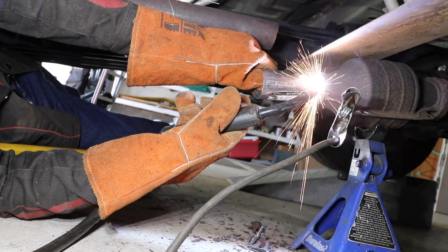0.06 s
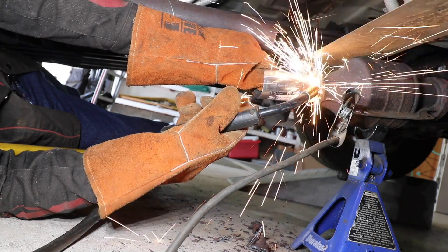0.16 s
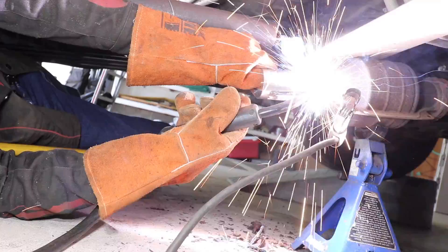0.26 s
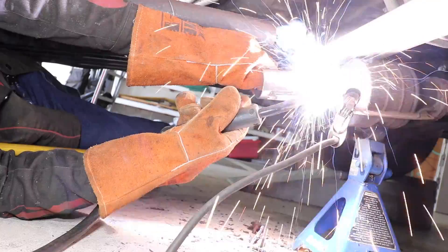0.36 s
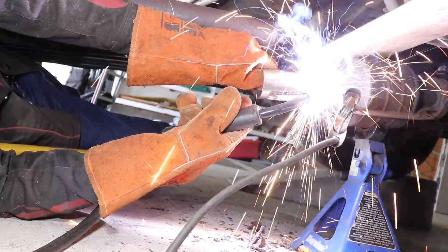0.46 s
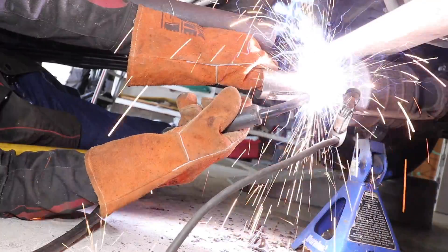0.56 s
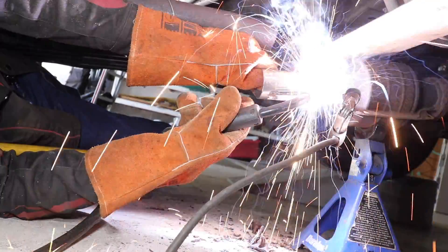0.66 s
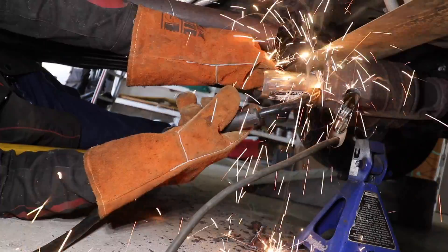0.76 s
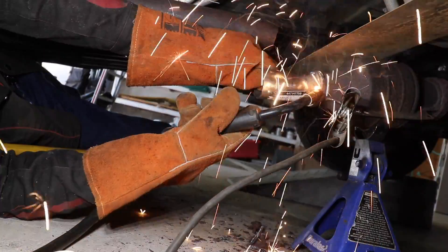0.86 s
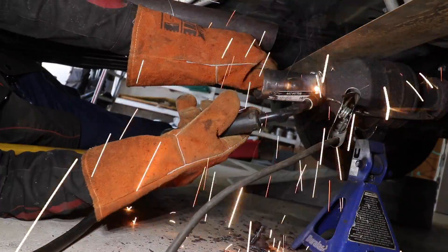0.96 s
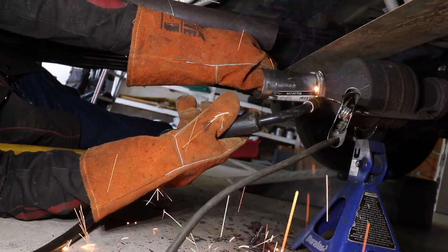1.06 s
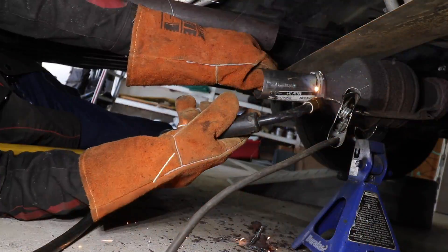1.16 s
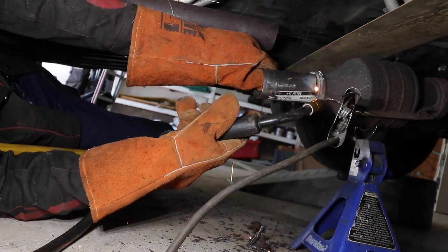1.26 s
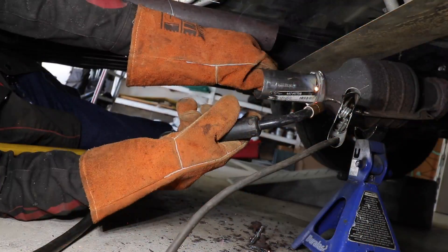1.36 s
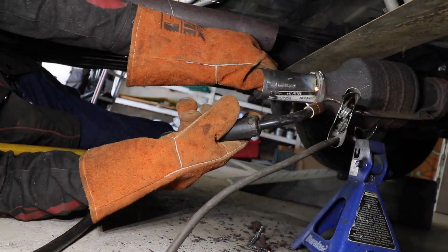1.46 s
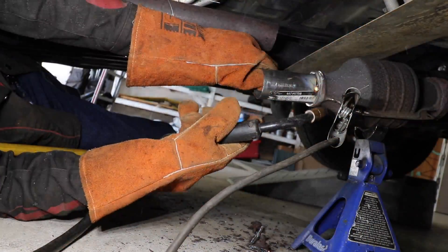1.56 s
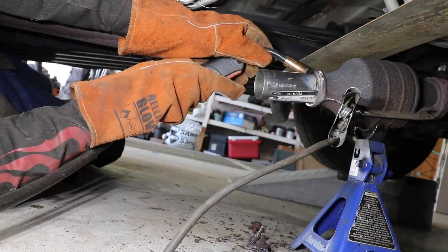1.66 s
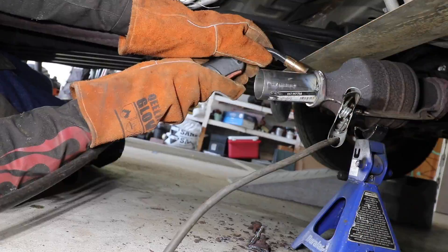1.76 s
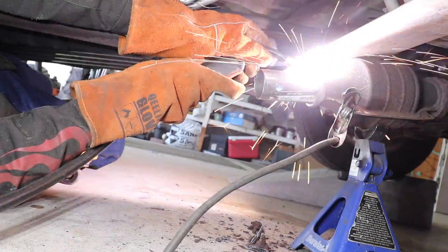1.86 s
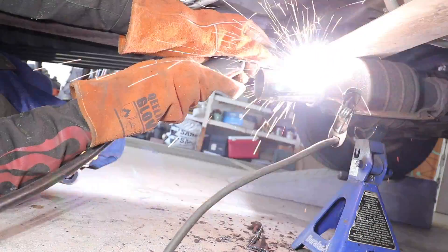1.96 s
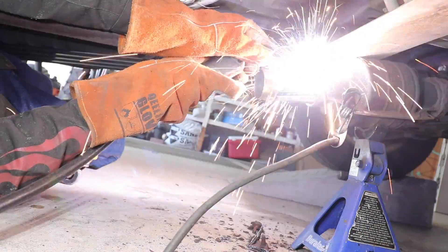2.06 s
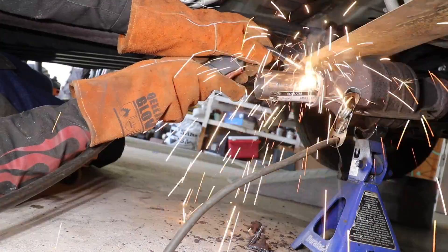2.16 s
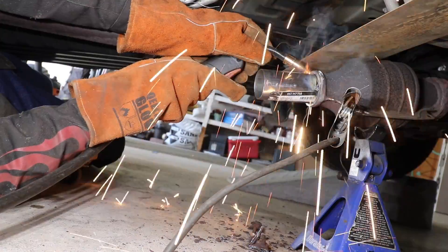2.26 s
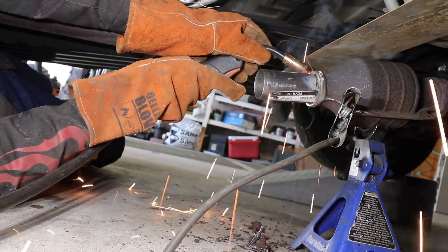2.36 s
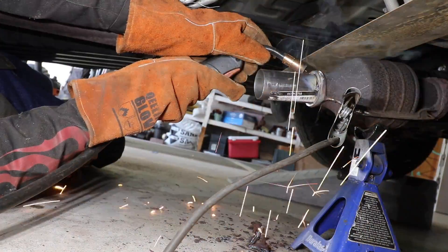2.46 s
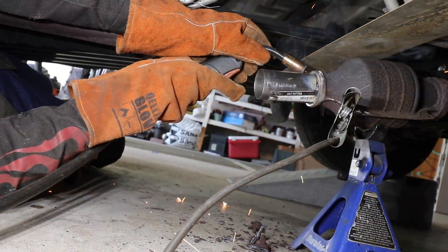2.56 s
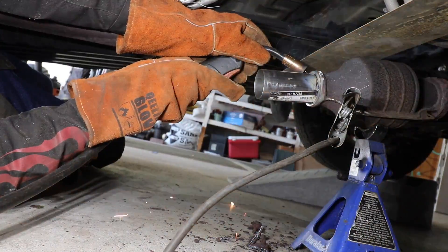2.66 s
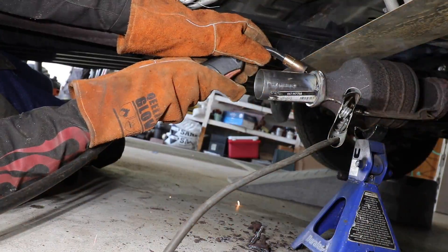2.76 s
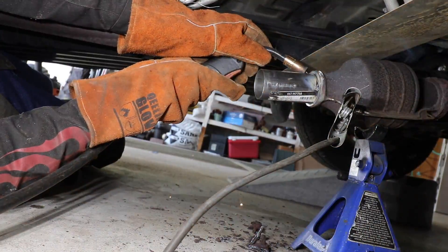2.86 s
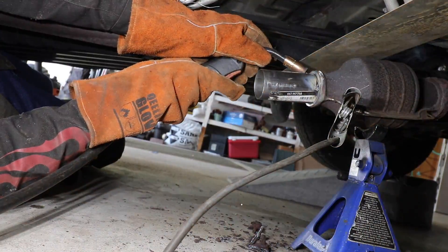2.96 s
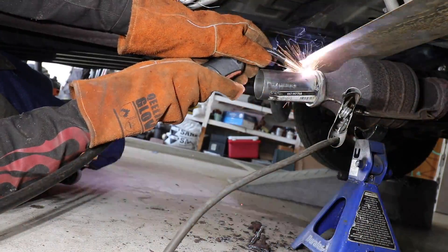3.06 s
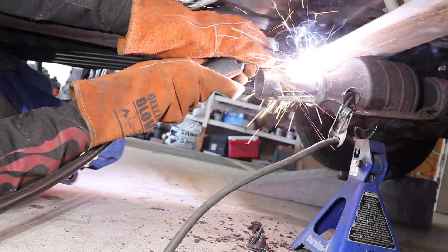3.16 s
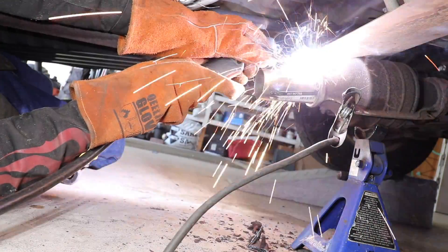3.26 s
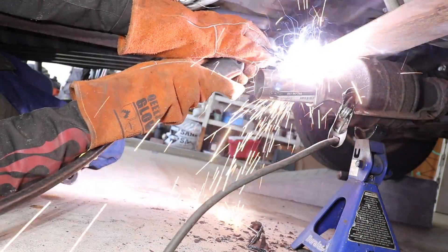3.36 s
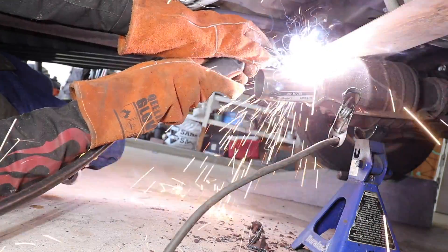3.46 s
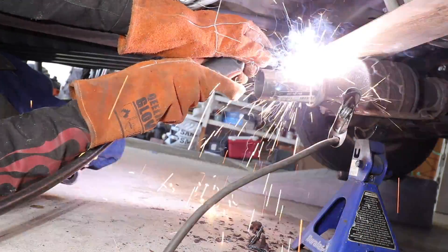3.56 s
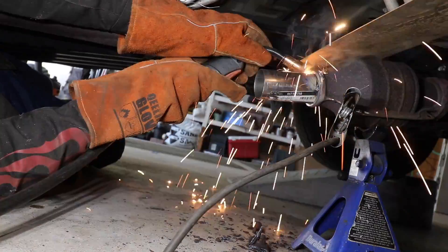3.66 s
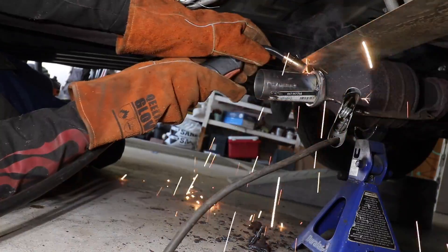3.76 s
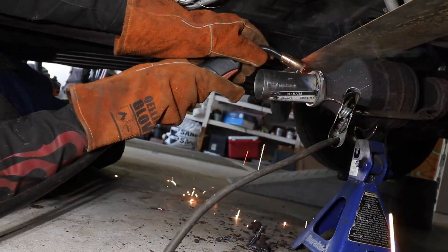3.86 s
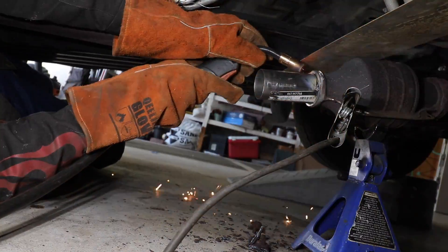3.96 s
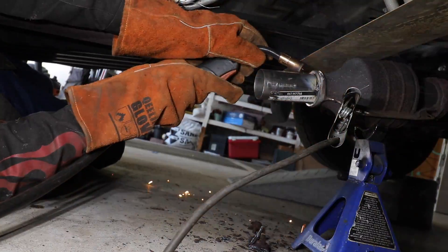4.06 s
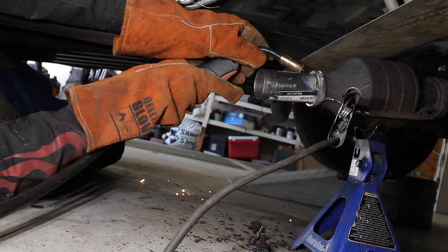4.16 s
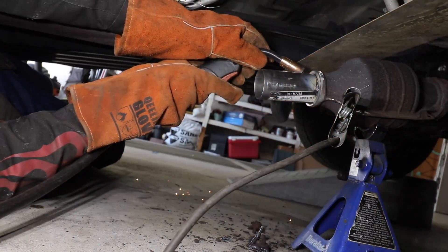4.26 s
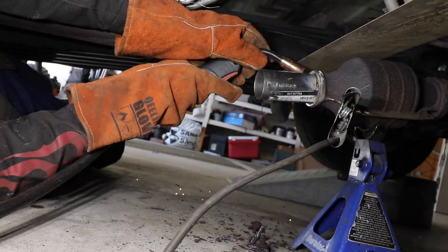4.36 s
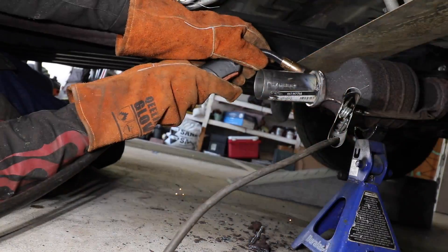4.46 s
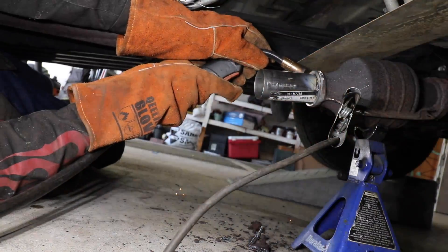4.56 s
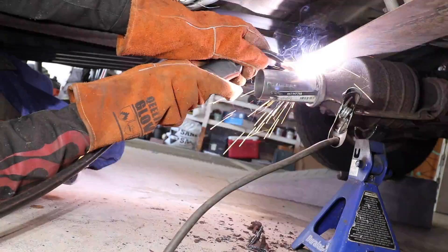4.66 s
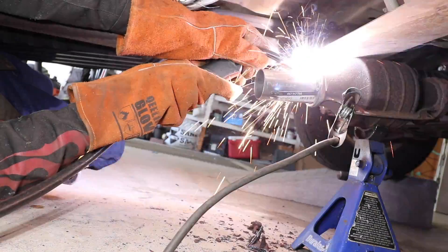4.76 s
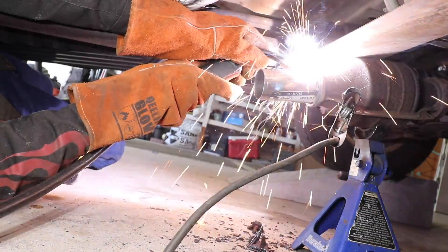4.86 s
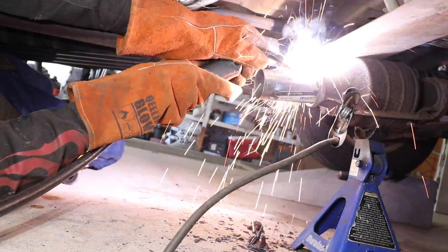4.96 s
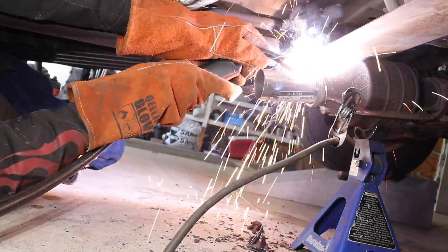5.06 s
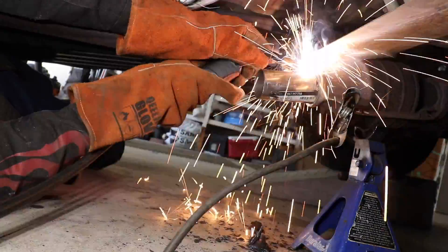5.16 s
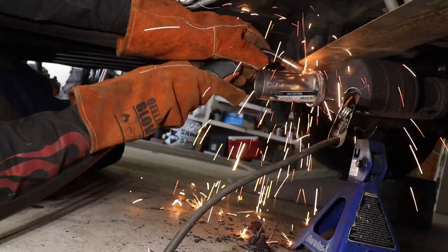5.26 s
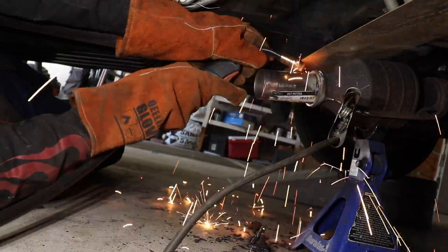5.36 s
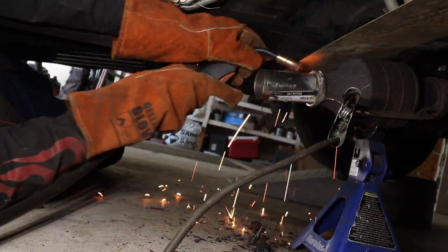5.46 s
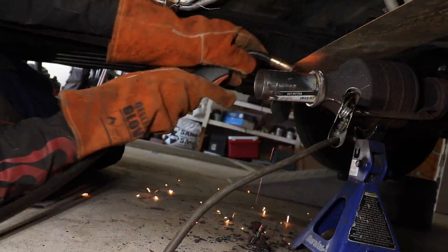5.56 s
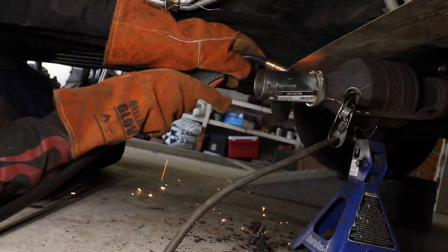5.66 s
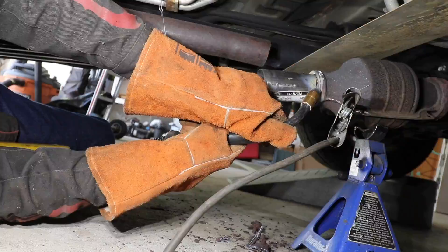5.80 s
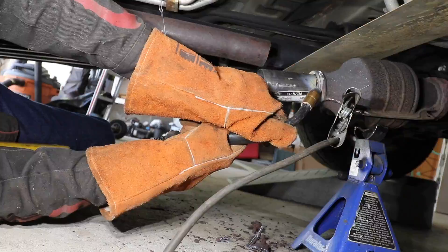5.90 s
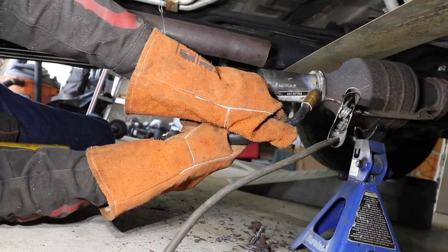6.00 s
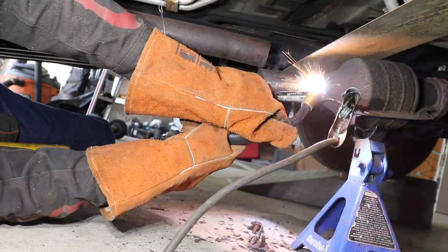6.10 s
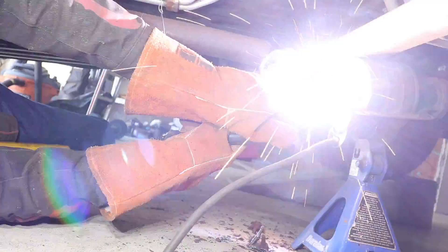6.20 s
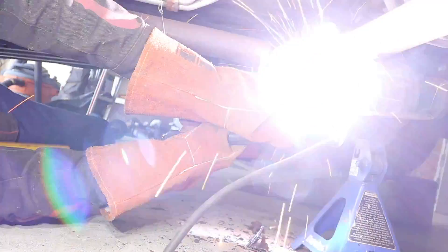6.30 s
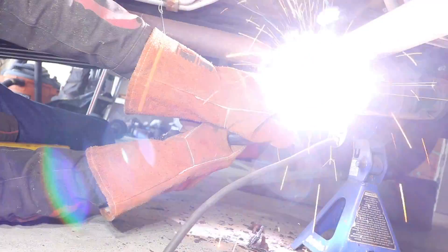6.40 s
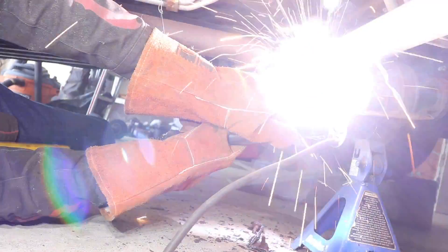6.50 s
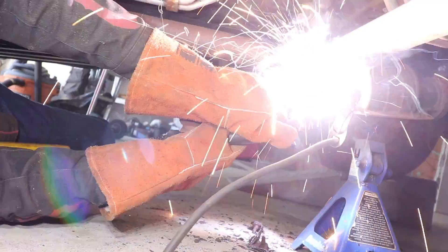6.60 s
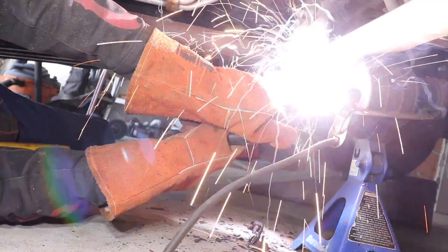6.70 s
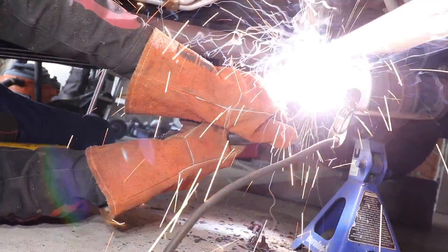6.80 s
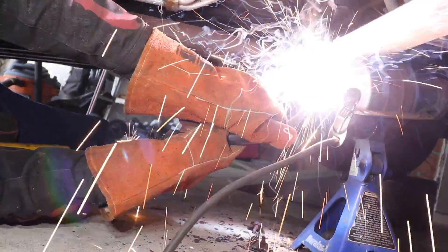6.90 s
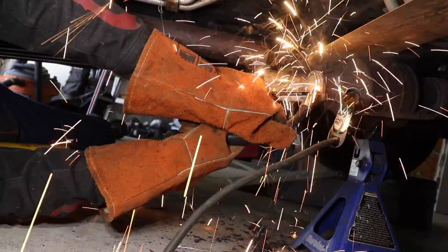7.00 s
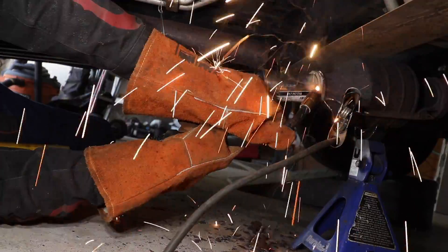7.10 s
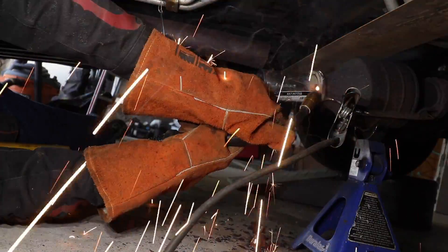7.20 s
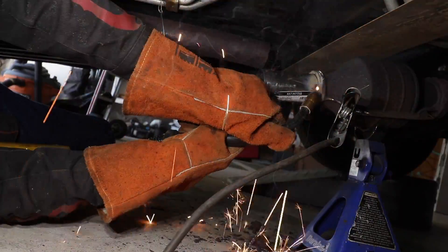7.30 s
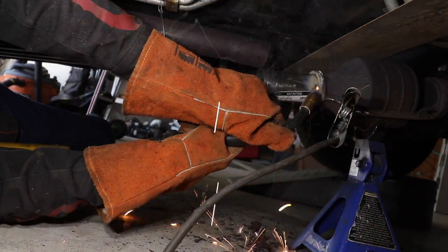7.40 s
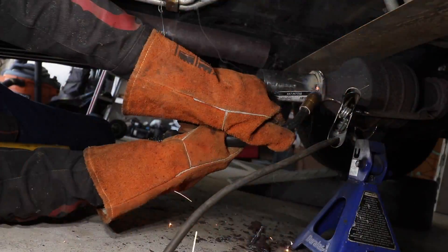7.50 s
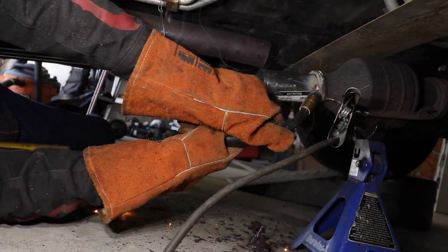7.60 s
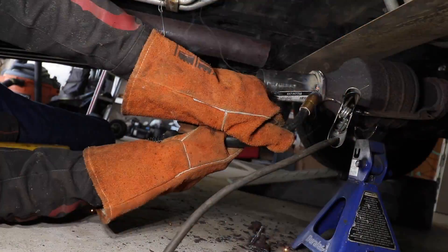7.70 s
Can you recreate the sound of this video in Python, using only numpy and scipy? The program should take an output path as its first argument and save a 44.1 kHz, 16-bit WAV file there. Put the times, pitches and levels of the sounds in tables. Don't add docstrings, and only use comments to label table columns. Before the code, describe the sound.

Five brief welding tacks: gas hiss, metallic knock, overloaded bangs, dense sizzling sparks, then abrupt stops with a low fan hum creeping up.

```python
import sys
import numpy as np
from scipy import signal
from scipy.fft import rfft, irfft, next_fast_len
from scipy.io import wavfile
from scipy.ndimage import uniform_filter1d, map_coordinates

SR = 44100
rng = np.random.default_rng(int(sys.argv[2]) if len(sys.argv) > 2 else 0)


def log_audio(samples):
    frames = np.atleast_2d(samples).T
    limited = np.clip(frames, -1, 1)
    pcm = np.round(limited * 32767).astype(np.int16)
    wavfile.write(sys.argv[1], SR, pcm)


def magnitude_from_level(level_db):
    exponent = np.asarray(level_db, float) / 20
    return 10 ** exponent


N = 341334
T = np.arange(N) / SR
OPEN_DB = -19.5

# t/s, level/dB
TACKS = [
    [(.214, -24), (.3, -22.5), (.34, -25.5), (.42, -22), (.58, -25.5), (.7, -26.5)],
    [(1.918, -20), (1.96, -17.5), (2.01, -25.5), (2.04, -21), (2.12, -24.5)],
    [(3.1, -21.5), (3.24, -21), (3.29, -25.5), (3.34, -24), (3.49, -23.5), (3.54, -19), (3.59, -22)],
    [(4.63, -14), (4.65, -23), (4.71, -21.5), (4.96, -24.5), (5.14, -21.5), (5.19, -30)],
    [(6.235, -36), (6.25, -23.5), (6.5, -25), (6.7, -28), (6.75, -25.5), (6.91, -26), (6.935, -25.5)],
]
# t/s, peak level/dB
STRIKES = [(0.087, 13.5), (0.095, 2.5), (.1105, -4), (0.1324, 4.5), (.157, 13), (0.1605, -2), (0.2134, 2.5),
           (0.2158, -12), (1.8277, 7), (1.8284, -7), (1.837, 15.5), (1.8748, -6), (1.8783, -10),
           (3.0747, 2), (3.0795, -1), (3.082, -8), (3.0988, 10), (3.12, 3), (3.1343, -8), (4.5997, 5.5),
           (4.6038, -4), (4.609, -1), (4.613, -5), (4.629, 6), (4.6314, 9), (6.1278, 6), (6.138, 16.5),
           (6.1426, 10), (6.2198, 1.5), (6.2261, 2.5)]
# f/Hz, level/dB per Hz
GAS = [(1000, -8.5), (2500, -0.5), (5000, -11), (7500, -4.5), (11000, -8), (15500, -17.5), (16200, -49)]


def unit(x):
    return x / np.sqrt(np.mean(x ** 2) + 1e-20)


def along(points, hz):
    f, v = np.transpose(points)
    return np.interp(np.log(hz + 1), np.log(f + 1), v)


def level(tables):
    return sum(magnitude_from_level(np.interp(T, *np.transpose(rows), left=-120, right=-120)) for rows in tables)


def wobble(rate):
    return map_coordinates(rng.standard_normal(int(N * rate / SR) + 4), [T * rate])


def filtered(x, response):
    size = next_fast_len(N + 8192)
    return irfft(rfft(x, size) * response(np.fft.rfftfreq(size, 1 / SR)), size)[..., :N]


def causal(gain_db, size=1024):
    gain = np.maximum(magnitude_from_level(gain_db(np.fft.rfftfreq(size, 1 / SR))), 1e-5)
    cepstrum = irfft(np.log(gain))
    cepstrum[1:size // 2] *= 2
    cepstrum[size // 2 + 1:] = 0
    return unit(irfft(np.exp(rfft(cepstrum)))) / np.sqrt(size)


def bursts(rows, spike):
    out, t = np.zeros(N + SR), np.arange(SR // 8) / SR
    for s, db, t60 in rows:
        puff = rng.standard_normal(len(t)) * magnitude_from_level(-60 * t / np.clip(t60, .002, .1))
        puff[0] = spike
        out[round(s * SR):][:len(t)] += magnitude_from_level(db) * puff
    return out[:N]


def tail(t60s):
    noise = rng.standard_normal((2, SR // 2))
    hz, t, z = signal.stft(noise, SR, nperseg=128)
    decay = magnitude_from_level(-60 * t / along(t60s, hz)[:, None])
    return signal.istft(z * decay, SR, nperseg=128)[1][:, :SR // 2]


def fan():
    # f/Hz, level/dB per Hz
    air_colour = [(18, -67), (30, -30), (80, -29.5), (156, -17.5), (207, -8), (239, -22), (263, -24.5),
                  (376, -20.5), (501, -24.5), (734, -24), (808, -29.5), (978, -24), (1400, -24),
                  (1820, -30), (9000, -58), (11700, -92), (19800, -120)]
    # f/Hz, likeness (1 = same)
    air_alike = [(60, 0.57), (290, 0.99), (640, 0.43), (1400, 0.51), (3000, 0.16)]
    # f/Hz, level/dB against the blade tone
    hums = [(48, -35), (71, -23), (97, -19), (119, -23), (142.5, -17.5), (285, -26), (419.5, -35),
            (630, -30), (730, -30.5), (970, -25.5), (1264, -29)]
    blade_hz = 209.2
    turn = 2 * np.pi * np.cumsum(blade_hz * (1 + 0.0013 * wobble(21))) / SR
    blade_gain = magnitude_from_level(1.1 * wobble(25) + np.array([[-1.], [1.]]))
    blade = blade_gain * np.sin(turn + np.array([[.17], [-.17]]))

    hum = 0
    for hz, db in hums:
        rate = 8 + hz / 25
        unsteady = 1.14 + 0.52 * wobble(rate) + .7j * wobble(rate)
        hum = hum + magnitude_from_level(db - 2) * np.imag(unsteady * np.exp(2j * np.pi * hz * T))

    def split(hz):
        lean = np.arccos(np.clip(along(air_alike, hz), -1, 1)) / 2
        return magnitude_from_level(along(air_colour, hz)) * [np.cos(lean), np.sin(lean)]

    def lead(hz):
        return np.exp(1j * np.pi * hz * 8 / SR * np.array([[1], [-1]]))

    mid, side = filtered(rng.standard_normal((2, N)), split)
    air = unit(filtered(np.array([mid + side, mid - side]), lead)) * magnitude_from_level(-9.5)
    return np.sqrt(2) * (blade + hum) + air


def knocks():
    # t/s, rms level/dB, stops at t/s, brightness/dB per octave
    hits = [
        (0, -27, 0.12, -0.5),
        (1.8236, -20, 1.85, 0.5),
        (3.039, -38, 3.068, -3.5),
        (3.0749, -19.5, 3.102, 0),
        (4.5997, -20.5, 4.632, 0.5),
        (5.6385, -28, 5.766, -1.5),
        (6.0493, -20.5, 6.27, 2.3),
    ]
    # f/Hz, level/dB per Hz
    pipe = [(200, 4), (600, -10), (1300, 6), (1800, -5), (2250, 0.5), (2750, -4.5), (3200, -3), (3700, 0),
            (5000, -4.5), (8000, -6.5), (12000, -11.5), (16000, -39)]
    # f/Hz, t60/s
    chassis = [(500, 0.95), (2500, 1), (6000, 0.33), (14000, 0.26)]
    out, t = np.zeros((2, N + SR)), np.arange(SR // 2) / SR
    for s, db, end, tilt in hits:
        rattle = tail(chassis) * (1 + 2.15 * magnitude_from_level(-60 * t / 0.051)) * np.clip(t / 0.0012, 0, 1)
        modes_hz = np.array([2200, 3160]) * rng.normal(1, 0.0257, 2)
        tube = sum(0.18 * magnitude_from_level(-60 * t / 0.32) * np.sin(2 * np.pi * hz * t) for hz in modes_hz)
        rattle += .5 * rattle[::-1] + tube
        colour = causal(lambda hz: along(pipe, hz) + tilt * np.log2(hz / 2000 + .05))
        ring = signal.fftconvolve(rattle, colour[None], axes=1)[:, :len(t)]
        stopping = np.clip((end - s - t) / 0.001, 0, 1)
        out[:, round(s * SR):][:, :len(t)] += magnitude_from_level(db - 4) * ring * stopping
    return out[:, :N]


def gain_control():
    # starts at t/s, lets go at t/s, held level/dB, rebound level/dB
    ducks = [
        (-.1, -0.032, -32, -19),
        (0.087, .18, -40.5, -27),
        (0.144, 0.711, -45, -30),
        (1.828, 2.177, -40.5, -25.5),
        (3.073, 3.07, -26, -16),
        (3.095, 3.613, -40, -27.5),
        (4.621, 5.157, -39, -28),
        (6.136, 6.45, -41.5, -27),
        (6.416, 6.928, -46.5, -33),
    ]
    duck_s, rebound_s, creep_db_per_s = .015, 0.068, 13
    db = np.full(N, float(OPEN_DB))
    for duck, free, held_db, rebound_db in ducks:
        down = duck + duck_s
        up = free + rebound_s
        times = [duck, down, max(free, down), up, up + 10]
        levels = [OPEN_DB, held_db, held_db, rebound_db, rebound_db + 10 * creep_db_per_s]
        db = np.minimum(db, np.interp(T, times, levels))
    return magnitude_from_level(db)


def flow(gain):
    # t/s, level/dB, sinking/dB per s
    beads = [
        (.8, -41, 72),
        (2.185, -42.5, 16.5),
        (3.63, -40, 67),
        (5.23, -36.5, 90),
        (6.96, -44, 35),
    ]
    # touch t/s, level/dB
    trigger = [
        (1.824, -24),
        (3.072, -28),
        (4.599, -25),
        (5.636, -46),
        (6.047, -30.5),
    ]
    # from t/s, to t/s, level/dB
    handling = [
        (0, 0.083, -27.5),
        (1.11, 1.254, -48.5),
        (1.77, 1.782, -37),
        (2.73, 2.745, -44),
        (3.95, 3.96, -50),
        (4.17, 4.303, -52),
        (5.665, 5.76, -44.5),
        (7.268, 7.276, -54),
        (7.31, 7.57, -46),
    ]
    bed_db, bed_follows = -50, 0.2
    rush_db_per_s, edge_db_per_s = 1100, 400
    bed = magnitude_from_level(bed_db) * (gain / magnitude_from_level(OPEN_DB)) ** bed_follows
    cooling, rushes, rustles = np.zeros((3, N))
    for s, db, sink in beads:
        cooling += magnitude_from_level(db - np.maximum(sink * (T - s), edge_db_per_s * (s - T)))
    for s, db in trigger:
        rushes += magnitude_from_level(db - rush_db_per_s * np.abs(s - T)) * (T < s)
    for start, end, db in handling:
        outside = np.maximum(np.maximum(start - T, T - end), 0)
        rustles += magnitude_from_level(db - edge_db_per_s * outside)
    return np.sqrt(bed ** 2 + cooling ** 2 + rushes ** 2 + rustles ** 2)


def hiss():
    sizes = magnitude_from_level(np.minimum(3 * rng.exponential(size=(2, N)), 10))
    grains = (rng.random((2, N)) < 300 / SR) * sizes
    fizz = rng.standard_normal((2, N)) * magnitude_from_level(1.9 * wobble(30)) + 0.61 * unit(grains)
    return unit(filtered(fizz, lambda hz: magnitude_from_level(along(GAS, hz))))


def burning():
    # lights at t/s, dies at t/s, first level/dB, last level/dB
    stutters = [
        (.089, 0.14, -24, -24.5),
        (.135, 0.163, -39, -23),
        (1.822, 1.84, -18, -18),
        (1.868, 1.918, -35, -30),
        (6.119, 6.147, -20, -29),
        (6.144, 6.204, -55, -46),
        (6.206, 6.232, -20, -27),
    ]
    dies_s, dies_db, waver_db = 0.05, 42, 0.5
    curves = []
    for rows in TACKS:
        last_s, last_db = rows[-1]
        curves.append([*rows, (last_s + dies_s, last_db - dies_db)])
    for on, off, first, last in stutters:
        curves.append([(on, first), (off, last)])
    return level(curves) * magnitude_from_level(waver_db * wobble(14))


def small_pops(count=52):
    per_s, middle_db, spread_db = 70, -9, 3
    rows = []
    for tack, draws in zip(TACKS, rng.random((len(TACKS), count, 2))):
        on = tack[0][0]
        length = tack[-1][0] - on
        for k, (u, v) in enumerate(draws):
            after = (k + u) / per_s
            db = middle_db + 2 * spread_db * (2 * v - 1)
            if after > length:
                db -= 99
            rows.append((on + after, db))
    return rows


def under_car(x, spectra):
    t = np.arange(1400) / SR
    fading = (magnitude_from_level(-9 - 60 * t / .006) + magnitude_from_level(-20 - 60 * t / .03)) * (t > .0002)
    paths = rng.standard_normal((2, len(t))) * fading
    paths[:, 172] += .2
    paths[0, 2] = paths[1, 0] = 1
    z = rfft(paths, 4096)
    z /= np.sqrt(uniform_filter1d(np.abs(z) ** 2, size=22, axis=1))

    def shadow(hz):
        bass_cut = 18 * np.log2(np.clip(hz / 220, .01, 1))
        return bass_cut - 6 * np.exp(-((hz - 4700) / 550) ** 4)

    colour = np.array([causal(lambda hz: along(spectrum, hz) + shadow(hz)) for spectrum in spectra])
    response = signal.fftconvolve(irfft(z)[:, :2048], colour, axes=1) * magnitude_from_level([[-1.7], [1.7]])
    return signal.fftconvolve(x, response, axes=1)[:, :N]


def arc():
    # t/s, peak level/dB
    big_pops = [(.2825, -2.5), (.2957, -2), (.3136, 2), (.3212, 2.5), (.4339, 2), (.521, 1), (.5536, 1),
                (.6229, -11), (.6852, -1), (1.919, -4), (2.1426, 0.5), (3.34, 1), (3.458, -2), (4.719, -4),
                (4.8107, 1.5), (4.8632, 0.5), (4.9388, 0), (4.9534, -6), (5.0718, 0.5), (6.3047, 0),
                (6.3408, 0.5), (6.401, -2.5), (6.4564, 1), (6.4734, -2), (6.5627, -2), (6.6296, 1.5),
                (6.7367, -1.5), (6.821, -14), (6.8722, 0.5), (6.9051, -0.5)]
    # f/Hz, level/dB per Hz
    below_colour = [
        [(250, -16), (650, -17), (950, -13.5), (1500, -9), (2150, -1.5), (3000, -11.5), (3600, -6),
         (4800, -13.5), (5600, -9), (7200, -10), (9700, -0.5), (10800, -14), (13000, -10), (15700, -4.5)],
        [(250, -13), (650, -18.5), (950, -9.5), (1500, -7.5), (2150, -1), (3000, -12.5), (3700, -5),
         (4800, -10.5), (5600, -11), (8300, 1.5), (9500, 1.5), (10800, -4), (13000, -1.5), (15700, -9.5)],
    ]
    # f/Hz, level/dB per Hz
    above_colour = [
        [(300, -14.5), (650, -12), (950, -17.5), (1300, -3.5), (2200, -5.5), (3000, -2.5), (3900, -5.5),
         (4700, -11), (6000, -10.5), (7500, -2), (9800, -5.5), (10800, -2), (13000, -11.5), (15700, -10.5)],
        [(300, -15), (650, -18), (950, -6.5), (1300, 2), (2200, -9), (3000, -4.5), (3800, -3.5), (4700, -10.5),
         (5800, -8), (7500, 1), (9800, -2.5), (11500, -4.5), (13000, -6), (15700, -9)],
    ]
    size = magnitude_from_level(np.minimum(6.6 * rng.exponential(size=N), 11))
    sparks = (rng.random(N) < 900 / SR) * size * rng.choice([-1, 1], N)
    flares = signal.lfilter([1], [1, -np.exp(-1 / (0.00029 * SR))], np.abs(sparks))
    throb = (1 + .2 * np.sin(2 * np.pi * 120 * T)) * magnitude_from_level(1.8 * wobble(70) + .9 * wobble(20))
    noise = rng.standard_normal(N) + 1.1 * rng.standard_normal((2, N))
    crackle = 0.27 * unit(sparks) + 0.53 * unit(flares * noise) + 1.18 * unit(throb * noise)
    pops = bursts([(s, db, .004) for s, db in STRIKES + big_pops + small_pops()], spike=4.55)
    source = burning() * unit(crackle) + magnitude_from_level(-10.0) * pops
    above = (T > 1.7) & (T < 6.02)
    return under_car(source * ~above, below_colour) + under_car(source * above, above_colour)


def jolts():
    thump_hz, width_hz, thump_db = 1760, 440, 4.5

    def ring(f):
        return 1j * f * width_hz / (thump_hz ** 2 - f * f + 1j * f * width_hz)

    bangs = bursts([(s, db, .012) for s, db in STRIKES], spike=1.04)
    return magnitude_from_level(thump_db - 17) * filtered(bangs, ring)


def garage(x):
    # f/Hz, t60/s
    room = [(500, 0.32), (4000, 0.19), (14000, 0.035)]
    echo = tail(room)
    late = np.pad(x, ((0, 0), (400, 0)))
    return signal.fftconvolve(late, echo / np.linalg.norm(echo[0]), axes=1)[:, :N]


def spatter():
    # t/s, peak level/dB, t60/s
    ticks = [
        (0.8131, -39, 0.02),
        (1.0446, -38, 0.02),
        (1.1453, -32.5, 0.016),
        (2.7505, -37, 0.02),
        (5.7648, -23.5, 0.011),
        (7.2801, -23.5, 0.062),
        (7.3237, -32, 0.024),
        (7.3544, -34, 0.02),
        (7.5522, -31, 0.03),
        (7.6044, -34.5, 0.028),
    ]
    puffs = np.array([bursts(ticks, spike=1.5) for _ in "LR"])
    colour = causal(lambda hz: along(GAS, hz))
    return magnitude_from_level(-2.5) * signal.fftconvolve(puffs, colour[None], axes=1)[:, :N]


def clank():
    # f/Hz, level/dB, t60/s
    metal = [(2235, -0.5, .16), (2860, -12, .2), (3160, -3.5, 0.16), (3596, -17, .2), (4760, -12, 0.13),
             (6020, -22, .25)]
    start_s, end_s, clank_db = 5.639, 5.766, -24
    t = np.maximum(T - start_s, 0)
    modes = 0
    for hz, db, t60 in metal:
        rough = 3.5 * np.array([wobble(90), wobble(90)])
        modes = modes + magnitude_from_level(db - 60 * t / t60 + rough) * np.sin(2 * np.pi * hz * t)
    return magnitude_from_level(clank_db) * modes * (T < end_s)


def scene():
    near = arc() + spatter() + jolts()
    gain = gain_control()
    background = fan() + magnitude_from_level(-14.5) * garage(near / gain)
    return near + knocks() + clank() + flow(gain) * hiss() + gain * background


def top_cut(x):
    return signal.sosfilt(signal.butter(12, 16260, fs=SR, output="sos"), x)


def record(dry):
    top_hz = 15880
    overloaded = np.clip(dry, -1, 1)
    mix = filtered(overloaded, lambda hz: hz < top_hz)
    return top_cut(mix)


dry = scene()
out = record(dry)
log_audio(out)
```